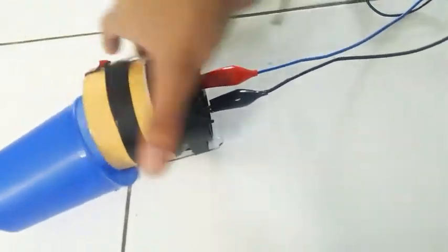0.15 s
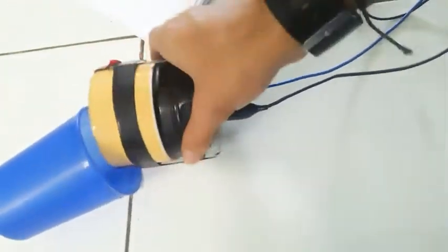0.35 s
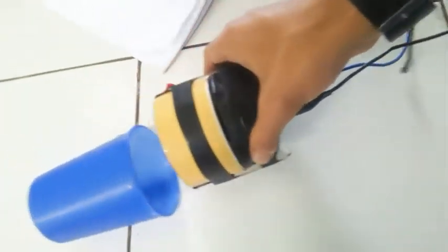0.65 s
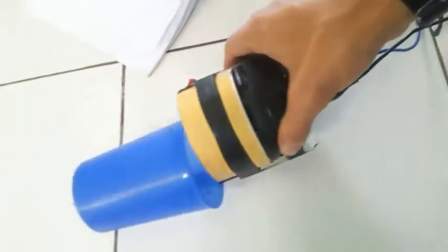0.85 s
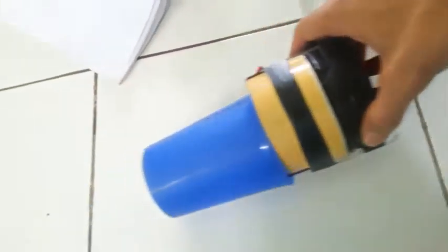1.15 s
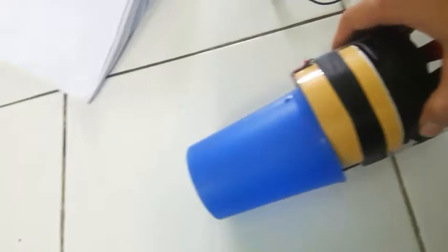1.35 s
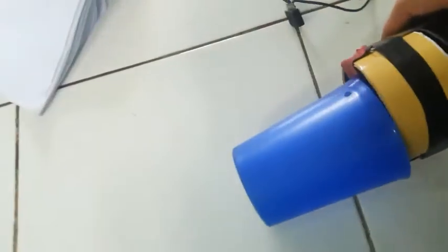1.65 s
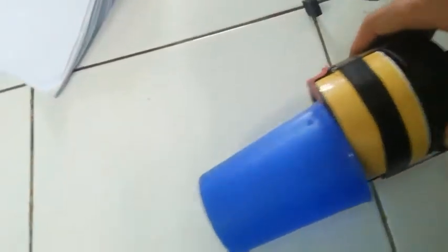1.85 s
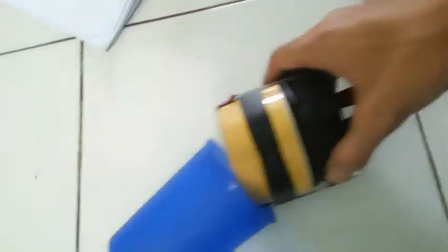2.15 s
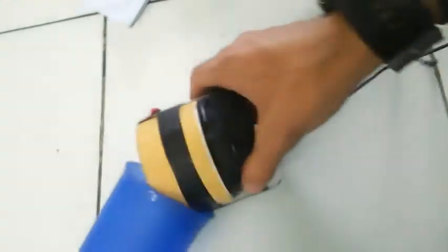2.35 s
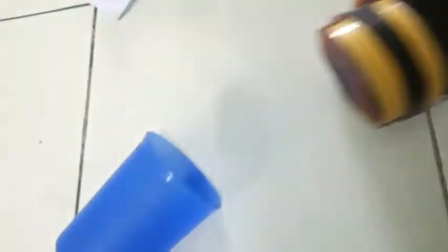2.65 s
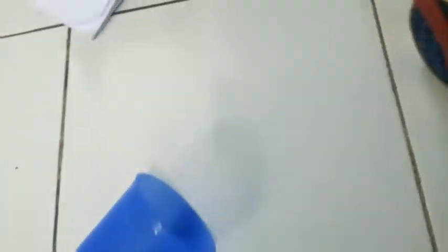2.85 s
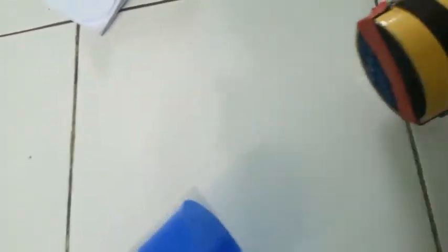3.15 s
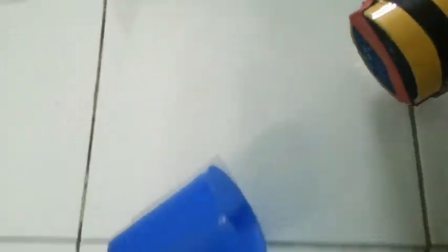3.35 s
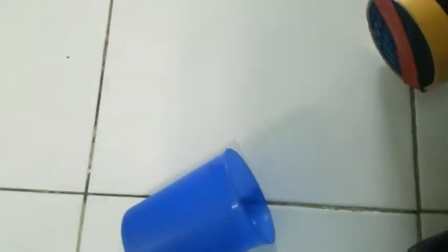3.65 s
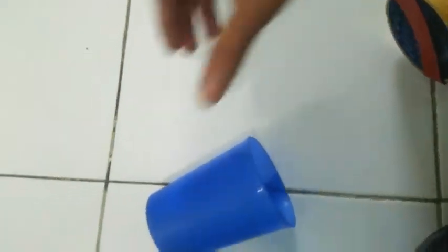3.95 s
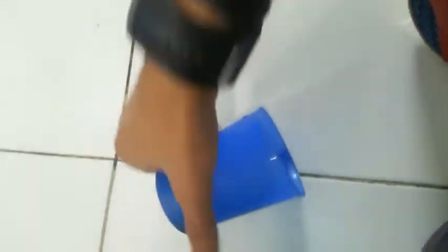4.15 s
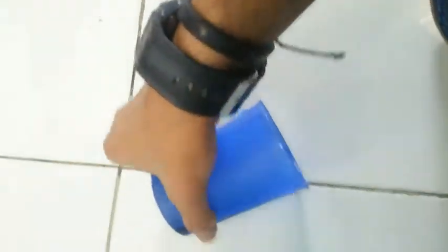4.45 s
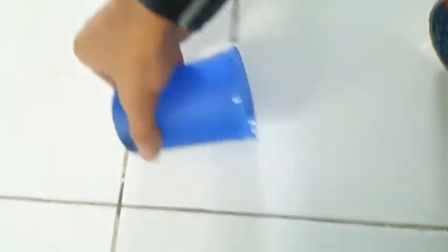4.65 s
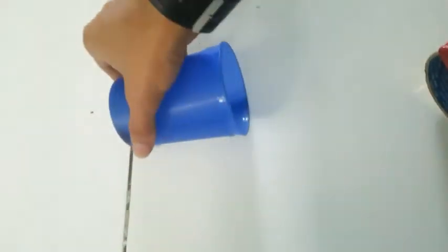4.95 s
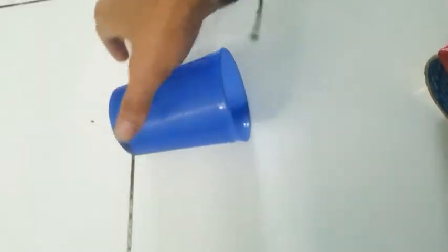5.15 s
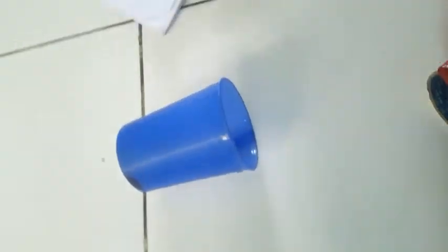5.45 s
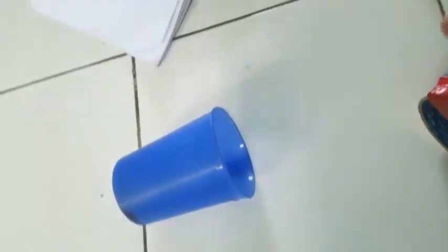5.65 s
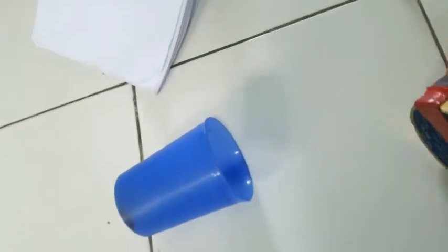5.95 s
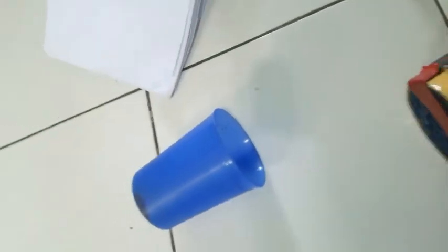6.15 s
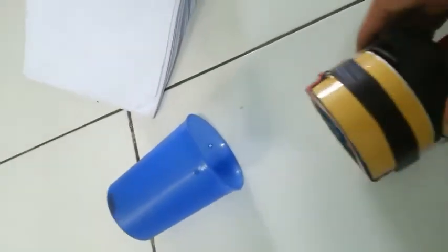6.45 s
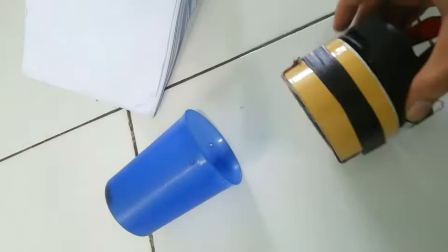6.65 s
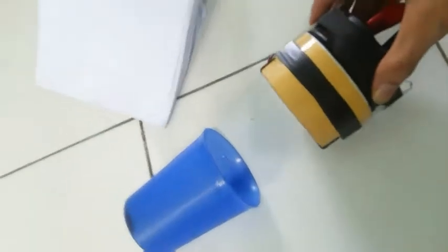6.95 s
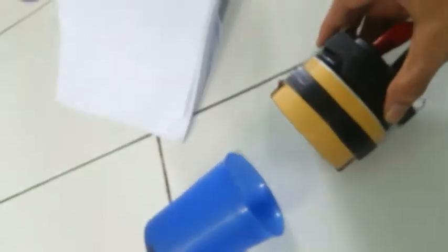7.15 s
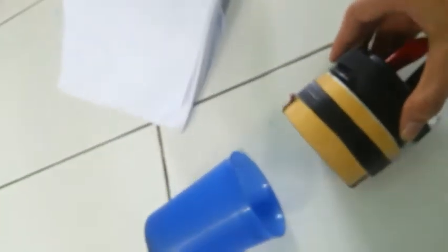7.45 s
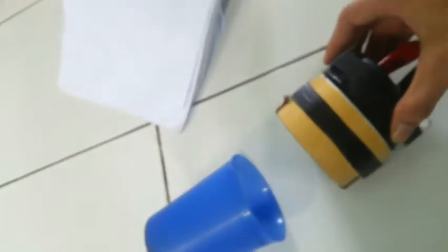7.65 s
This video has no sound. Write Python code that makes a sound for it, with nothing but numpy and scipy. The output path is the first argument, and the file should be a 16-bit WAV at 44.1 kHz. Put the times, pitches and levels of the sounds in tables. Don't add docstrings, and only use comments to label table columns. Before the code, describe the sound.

A small electric fan roars close up, hollow howls breaking out as a plastic cup is sucked onto it, then steady shifting airy rush.

```python
import sys
import numpy as np
from scipy import signal
from scipy.io import wavfile
from scipy.ndimage import uniform_filter1d

SR = 44100
rng = np.random.default_rng(int(sys.argv[2]) if len(sys.argv) > 2 else 0)


def put_to_file(sound):
    columns = np.atleast_2d(sound).T
    safe = np.clip(columns, -1, 1)
    whole_steps = np.round(safe * 32767)
    wavfile.write(sys.argv[1], SR, whole_steps.astype(np.int16))


def rack_gain(trim_db):
    fader = np.asarray(trim_db, float)
    return 10 ** (fader / 20)


N = 344862
FRAME = 1024

# time in seconds, stream level at the right port in dB, left minus right in dB,
# bearing as the delay of the right port in ms.
PLACE = [(0, -29.5, -3, .19), (.45, -26.5, -1.5, 0.17), (.62, -31.5, 0, 0.14), (.9, -25.5, -2.5, 0.21),
         (1.14, -33.5, -3.5, 0.16), (1.3, -24.5, -7.5, 0.048), (1.65, -26, -5.5, -0.028),
         (2.2, -22, -8.5, 0.023), (2.4, -30.5, -0.5, 0.19), (2.62, -31, 3.5, 0.12), (2.85, -32, -5, -0.075),
         (3.6, -30.5, -5.5, -0.054), (4.3, -30.5, -2, -0.038), (5.3, -28.5, -3, -0.1), (6, -29, -3, 0.013),
         (6.55, -29.5, -5.5, 0.0075), (6.85, -31, -0.5, 0.047), (7.8, -30, 0.5, 0.076)]
# time in seconds, share laid aside from 0 to 1, share held aloft from 0 to 1.
POSE = [
    (0, 0.09, 0.4),
    (2.5, 1, 0),
    (2.9, 0.86, 0.49),
    (5.3, 0.83, 0.09),
    (5.9, 0.18, 0.89),
    (6.5, 0.14, 0.98),
    (7.8, 0.01, 1),
]
# frequency in Hz, left level in dB per Hz, right level in dB per Hz.
STREAM_COLOUR = [(20, -36, -55), (57.3, -24.5, -23), (213, -29, -30.5), (318, -25, -24),
                 (566, -22.5, -22.5), (793, -23.5, -22.5), (1120, -31, -38.5), (1580, -25.5, -27.5),
                 (2470, -29, -28.5), (4000, -31.5, -33), (5300, -34.5, -35.5), (5950, -48, -35.5)]
# centre in Hz, width in Hz, left lift in dB, right lift in dB.
LAID_PEAKS = [(372, 530, 9.5, 9.5), (661, 280, -3, -16), (960, 470, 9, 16.5), (1307, 61, -15, 11.5),
              (1442, 24, 14, -9)]
# centre in Hz, width in Hz, left lift in dB, right lift in dB.
HELD_PEAKS = [(112, 280, 9.2, 7.3), (249.4, 56, 8.9, 14.4), (780, 275, 1.7, 6), (967, 71, 11.4, 12.4),
              (1208, 280, 9.9, 1.7)]
# centre in Hz, width in Hz, widening in Hz per Hz of rise, right level in dB,
# left minus right in dB.
MODES_AT_REST = [
    (1990, 386, 0.6, -51, 6.5),
    (2900, 273, -0.31, -32.5, -7.5),
    (4400, 540, -0.3, -37.5, -1),
    (5800, 680, -0.26, -44, 5),
]
# middle in seconds, length in seconds, peak in dB, centre in Hz, left minus
# right in dB.
LOBES_LOWEST = [(0.32, 0.16, -19, 1780, -3), (1.34, 0.35, -22.5, 1860, -7), (2.14, 0.32, -16.5, 2550, -15),
                (2.772, 0.18, -18, 2000, -11), (3.27, 0.56, -19, 2100, -10), (3.73, 0.52, -20, 1764, -6),
                (4.14, 0.2, -20, 1830, -19), (4.59, 0.61, -23, 1790, -7), (5.48, 1.1, -22, 1880, -10),
                (5.755, 0.18, -22.5, 1860, 7.5), (5.846, 0.33, -16.5, 2000, -16),
                (6.33, 0.23, -15, 1976, -25), (6.62, 1.1, -23, 1960, -3), (7.6, 2.4, -19.5, 2270, -5.5),
                (6.0, 0.15, -14.5, 2200, -30), (7.28, 0.49, -22, 2700, -7), (2, 0.69, -24.5, 1415, -6),
                (2.47, 0.43, -30, 1267, 9.5), (4.31, 0.3, -28, 1200, -12), (4.88, 2.45, -30.5, 1450, 5.5),
                (1.88, .3, -23.5, 2360, 1.5), (2.4, 0.6, -37.5, 2420, 9.5), (11, 0.28, -32.5, 2050, 12),
                (0.11, .4, -41.5, 2000, 14), (6.16, 0.32, -14, 2280, -25), (5.3, 0.15, -24, 2150, -15),
                (5.15, 0.35, -31, 2200, -8), (1.33, 0.15, -18.5, 2900, -12)]
LOBES_SECOND = [(.4, 0.28, -23.5, 2690, -4), (.72, 1, -21, 2950, -6.5), (1.2, 0.28, -15.5, 2690, -21),
                (1.38, 0.3, -10, 2960, -22), (1.4, 0.5, -18, 2670, -12), (1.62, 0.2, -23, 3050, -1),
                (2.25, 0.85, -17, 2920, -28), (2.5, 1, -17, 2970, -20), (2.8, 0.24, -15.5, 2770, -14),
                (3.25, 0.39, -24, 3020, -2), (3.65, 0.77, -18, 2906, -20), (3.8, 0.49, -19, 2660, -14),
                (4.08, 0.45, -16, 2890, -32), (4.45, 0.33, -17.5, 2900, -30),
                (4.95, 0.36, -20.5, 2920, -24), (5.05, 0.93, -20, 2770, -17), (5.3, 0.22, -28, 2900, -17),
                (5.58, 0.67, -17, 2560, -16.5), (5.75, 1, -36.5, 2820, 11.5), (6.33, .12, -24, 3130, -3),
                (6.5, 0.22, -22.5, 3130, 0), (6.9, 0.7, -14, 3027, -15), (7.5, 1, -15.5, 2936, -9),
                (6.85, 0.78, -34, 3350, 14), (1.2, .2, -45, 3420, 10), (1.85, 0.44, -33.5, 3360, 7.5)]
LOBES_THIRD = [(.4, 0.42, -40, 4400, -16), (.74, 0.18, -18.5, 4900, -16), (.92, 0.23, -20.5, 4050, -11),
               (1.2, 0.31, -24, 4600, -14), (1.3, 0.31, -25.5, 4200, -15), (2.25, 0.3, -25, 4470, -3),
               (2.6, 0.41, -23.5, 3950, -12), (3.05, 0.45, -39.5, 4500, 10), (4.2, 0.37, -19.5, 4730, -30),
               (4.6, 0.64, -26, 4630, -22), (5.3, 0.21, -39, 3930, 6), (6.6, 0.45, -27, 4430, 0),
               (7.1, 0.93, -19.5, 4570, -10), (7.75, 0.29, -25.5, 4760, -20), (.9, 0.19, -26.5, 5200, -8),
               (.27, 0.2, -25, 4250, -12), (1.2, .2, -30, 4800, -17), (1.1, .15, -24, 4300, -7),
               (4.95, 0.34, -36, 4800, -8)]
LOBES_HIGHEST = [(0, 0.41, -16.5, 6540, -31), (.4, 0.28, -25, 5460, -22), (.3, 0.25, -27.5, 6070, -20),
                 (.57, .1, -29, 5600, -20), (1, 0.14, -32, 5300, -22), (2.47, 0.22, -21, 5500, -22),
                 (3.15, 1, -27.5, 5630, -3.5), (3.8, 0.37, -31.5, 6200, -6), (3.33, 0.14, -28, 6000, -12),
                 (4.35, 0.36, -21.5, 5800, -14), (4.6, 0.4, -23, 5650, -18), (5.35, 1, -25.5, 5620, -7),
                 (6.35, 0.43, -32, 5650, -4), (7.8, 0.16, -33, 5770, -8)]
# touch in seconds, parting in seconds, howl level in dB, howl pitch in Hz,
# left minus right in dB.
CUP_HOWLS = [(0.085, 0.515, -7, 700, -3), (0.902, 1.016, -8, 683, -1.5), (1.176, 1.323, -10, 610, -3.5),
             (1.36, 1.54, -7, 616, -3), (1.58, 1.68, -11, 650, -2), (1.715, 1.84, -6.5, 595, -4.5),
             (1.873, 1.924, -7.5, 556, -5), (1.952, 2.02, -7, 670, -4.5), (2.07, 2.143, -3.5, 655, -4),
             (2.16, 2.266, -3, 653, -6), (2.32, 2.482, -4.5, 713, -4.5), (2.564, 2.62, -22, 720, -10)]
# start in seconds, end in seconds, right level in dB,
# left minus right in dB.
LEAKS = [
    (1.158, 1.42, -39, -24),
    (1.444, 1.55, -37, -18),
    (1.6, 2.04, -39.5, -7),
    (2.068, 2.428, -38, -21),
]
# frequency in Hz, level in dB per Hz.
LEAK_COLOUR = [(6500, 8), (9000, -1), (12000, -3), (15000, -5)]
SURGES = [.122, .354, .877, 1.04, 1.141, 1.161, 1.237, 1.436, 2.145, 2.375, 2.408, 4.046, 6.127, 6.774,
          6.845, 6.897, 7.02, 7.065, 7.113, 7.172, 7.2, 7.218, 7.239, 7.259, 7.37, 7.465]
# time in seconds, peak level in dB.
TICKS = [
    (2.144, -20),
    (2.519, -16),
    (2.808, -18),
    (4.2505, -2),
    (5.529, -19),
]
# frequency in Hz, level in dB, decay by 60 dB in seconds.
RIM_RING = [(2200, -12, .012), (5000, 0, .018), (5800, -3, .016)]
# frequency in Hz, left level in dB per Hz, right level in dB per Hz.
HISS_COLOUR = [(6500, -29, -75), (6900, -55, -70), (6940, -45.5, -65), (8000, -35.5, -103),
               (9300, -36.5, -95.5), (10930, -41, -88), (10700, -44, -97), (14800, -52.5, -98)]
# frequency in Hz, coherence from 0 to 1, extra phase in radians.
PORT_LIKENESS = [(61, 0.98, 0.59), (698, 0.9, 0.11), (925, 0.59, -0.25), (1970, 0.4, 0.37),
                 (2140, 0.86, 0.93), (3350, 0.76, -0.78), (4050, 0.08, 0.79), (5350, 0.13, -0.76)]


def read(rows, at):
    x, *columns = np.transpose(rows)
    return np.array([np.interp(at, x, column) for column in columns])


def read_log(rows, hz):
    rows = np.array(rows, float)
    log_rows = np.c_[np.log(rows[:, 0]), rows[:, 1:]]
    return read(log_rows, np.log(hz + 1))[..., None]


def ports(db, lean_db):
    return rack_gain(2 * np.array([db + lean_db, db]))[:, None]


def lift(hz, peaks):
    total_db = 0
    for centre_hz, width_hz, left_db, right_db in peaks:
        shape = 1 / (1 + (2 * (hz - centre_hz) / width_hz) ** 2)
        total_db = total_db + np.array([[left_db], [right_db]]) * shape
    return total_db[..., None]


def mode(hz, centre_hz, width_hz, steep=2.09):
    shape = (1 + (2 * (hz[:, None] - centre_hz) / width_hz) ** 2) ** -steep
    bin_hz = hz[1]
    return shape / (shape.sum(0) * bin_hz)


def patches(shape, bins, frames):
    field = rng.standard_normal(shape)
    for _ in range(2):
        field = uniform_filter1d(field, bins, -2)
        field = uniform_filter1d(field, frames, -1)
    return field / field.std()


def stream(hz, t):
    level_db, lean_db, _ = read(PLACE, t)
    laid, held = np.clip(read(POSE, t), 0, 1)
    colour_db = read_log(STREAM_COLOUR, hz) + laid * lift(hz, LAID_PEAKS) + held * lift(hz, HELD_PEAKS)
    return rack_gain(2 * colour_db) * ports(level_db, lean_db)


def duct(hz, t):
    flank = 2.15
    power = 0
    all_lobes = [LOBES_LOWEST, LOBES_SECOND, LOBES_THIRD, LOBES_HIGHEST]
    for (rest_hz, rest_width_hz, wider, rest_db, rest_lean_db), lobes in zip(MODES_AT_REST, all_lobes):
        power = power + ports(rest_db + 0 * t, rest_lean_db) * mode(hz, rest_hz, rest_width_hz)
        for middle, length, peak_db, centre_hz, lean_db in lobes:
            lobe_db = peak_db - 6 * np.abs(2 * (t - middle) / length) ** flank
            width_hz = max(rest_width_hz + wider * (centre_hz - rest_hz), 100)
            power = power + ports(lobe_db, lean_db) * mode(hz, centre_hz, width_hz)
    return power


def cup(hz, t):
    close_db_per_s, part_db_per_s = 111, 147
    wall_db, wall_follows, wall_slower = -12.5, 0.16, 0.51
    power = 0
    for touch, part, db, howl_hz, lean_db in CUP_HOWLS:
        away_db = close_db_per_s * np.maximum(touch - t, 0) + part_db_per_s * np.maximum(t - part, 0)
        width_hz = 51 + 0.8 * max(700 - howl_hz, 0)
        column = mode(hz, 1.065 * howl_hz, width_hz, 1.96)
        swirl = rack_gain(2 * -5) * mode(hz, 0.96 * howl_hz, 780, 5.1)
        power = power + ports(db - away_db, lean_db) * (column + swirl)
        hum_db = wall_follows * db + wall_db - wall_slower * away_db
        power = power + ports(hum_db, lean_db) * mode(hz, 393, 163)
    return power


def leak(hz, t):
    edge_db_per_s, sputter_db = 600, -2
    gate = 0
    for start, end, db, lean_db in LEAKS:
        outside = np.maximum(np.maximum(start - t, t - end), 0)
        gate = gate + ports(db - edge_db_per_s * outside, lean_db)
    colour = rack_gain(2 * read_log(LEAK_COLOUR, hz)[0]) * (hz[:, None] > 6400)
    colour = colour / (colour.sum() * hz[1])
    sputter = rack_gain(2 * sputter_db * patches((2, len(hz), len(t)), bins=60, frames=2))
    return gate * colour * sputter


def surges():
    length, left_db, right_db = .003, 2, 6
    t = np.arange(N) / SR
    swell = sum(np.exp(-((t - s - length) / length) ** 2) for s in SURGES)
    return rack_gain(np.array([[left_db], [right_db]]) * swell)


def ticks():
    out = np.zeros(N)
    t = np.arange(SR // 20) / SR
    ring = sum(rack_gain(db - 60 * t / t60) * np.sin(2 * np.pi * hz * t) for hz, db, t60 in RIM_RING)
    tap = (1 - np.exp(-t / .0006)) * ring
    for s, db in TICKS:
        out[round(s * SR):][:len(t)] += rack_gain(db + 3) * tap
    left_db = -8
    return out * np.array([[-rack_gain(left_db)], [1]])


def grille_hiss(hz, t):
    late_ms = read(PLACE, t)[2]
    held = np.clip(read(POSE, t), 0, 1)[1]
    base_db, db_per_ms, held_db = -42.5, -39, 0
    level_db = read_log(HISS_COLOUR, hz) + base_db + db_per_ms * late_ms + held_db * held
    return rack_gain(2 * level_db) * (hz[:, None] > 6000)


def scene():
    overlap = FRAME * 3 // 4
    noise = rng.standard_normal((2, N))
    hz, t, (near, room) = signal.stft(noise, SR, nperseg=FRAME, noverlap=overlap)
    alike, extra_phase = read_log(PORT_LIKENESS, hz)
    alike = np.clip(alike, 0, 1)
    late_s = read(PLACE, t)[2] / 1000
    late = np.exp(1j * (extra_phase - 2 * np.pi * hz[:, None] * late_s))
    right = -late * (alike * near + np.sqrt(1 - alike ** 2) * room)
    pair = np.array([near, right])

    edge = 1 / (1 + (hz[:, None] / 6300) ** 130)
    power = (stream(hz, t) + duct(hz, t) + cup(hz, t)) * edge
    power = power + grille_hiss(hz, t) + leak(hz, t)

    drift_db = 1.8 * edge * np.clip(hz[:, None] / 900, .4, 1) * patches(pair.shape, bins=3, frames=26)
    eddy_db = 1.57 * patches(pair.shape[1:], bins=10, frames=5)
    grain_db = 3.5 * (1 - edge) * patches(pair.shape, bins=2, frames=5)
    spectrum = pair * np.sqrt(power * SR / 2) * rack_gain(drift_db + eddy_db + grain_db)
    air = signal.istft(spectrum, SR, nperseg=FRAME, noverlap=overlap)[1][:, :N]
    return air * surges() + ticks()


def top_cut(x):
    return signal.sosfilt(signal.butter(12, 15650, fs=SR, output="sos"), x)


def record(dry):
    swell = np.sqrt(np.abs(uniform_filter1d(dry ** 2, 300, axis=1)))
    held = dry / np.maximum(1, swell / 0.4) ** 0.47
    top = np.array([[.92], [.89]])
    knee = 40
    clipped = held / (1 + np.abs(held / top) ** knee) ** (1 / knee)
    coupled = signal.lfilter([1, -1], [1, -.985], clipped)
    return top_cut(coupled)


dry = scene()
out = record(dry)
put_to_file(out)
```